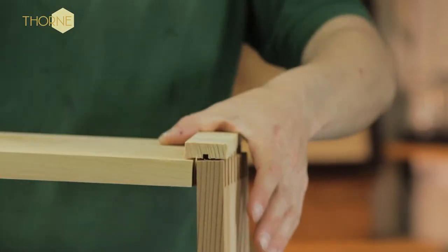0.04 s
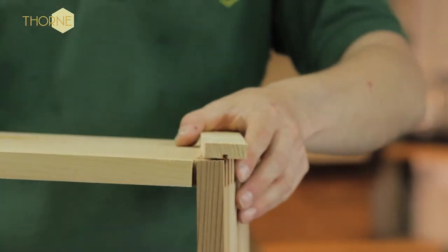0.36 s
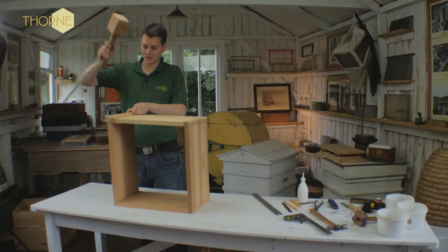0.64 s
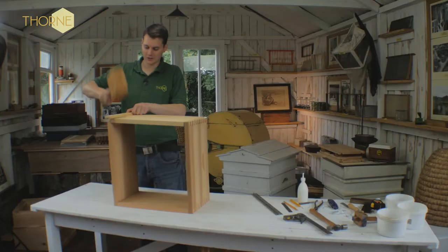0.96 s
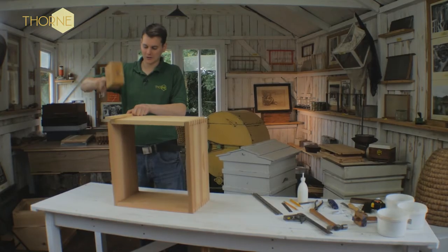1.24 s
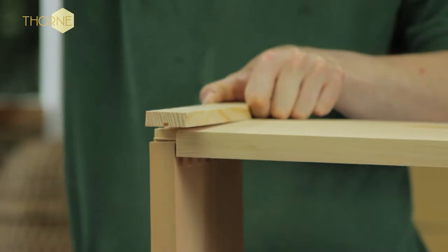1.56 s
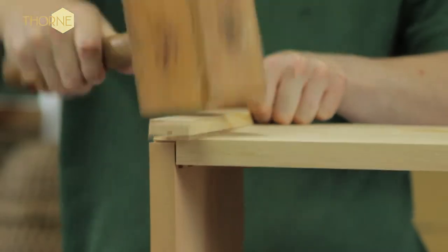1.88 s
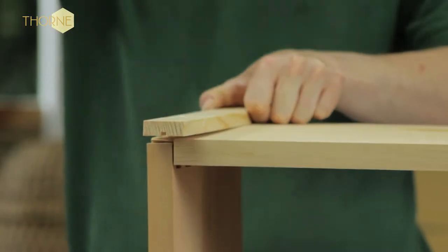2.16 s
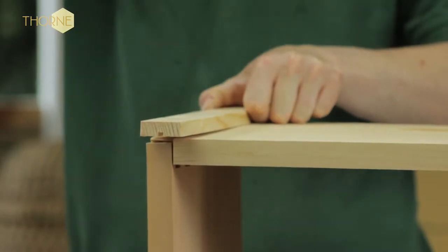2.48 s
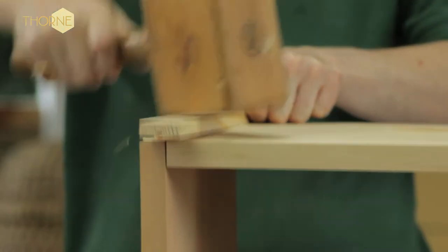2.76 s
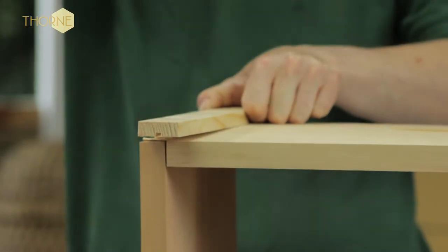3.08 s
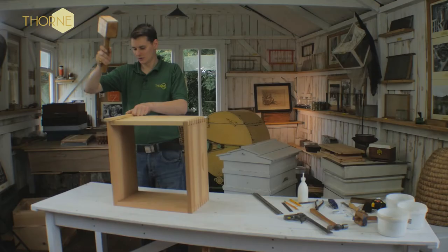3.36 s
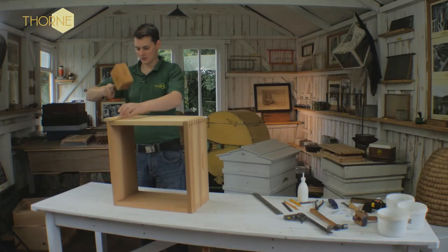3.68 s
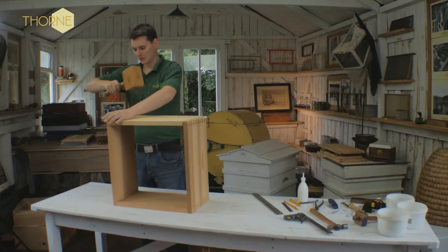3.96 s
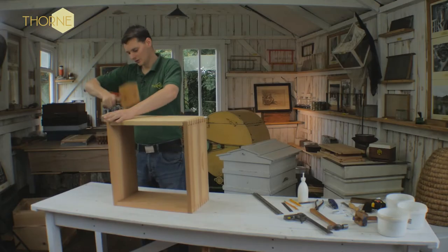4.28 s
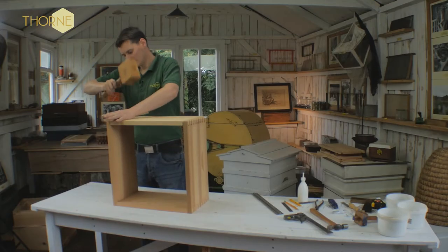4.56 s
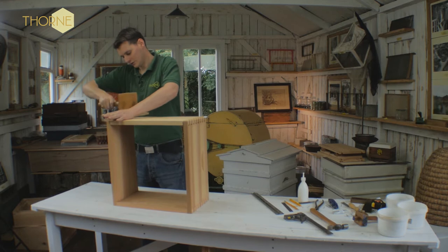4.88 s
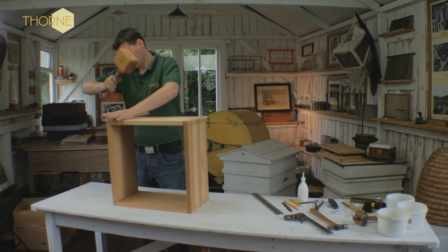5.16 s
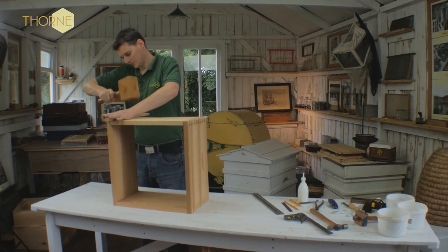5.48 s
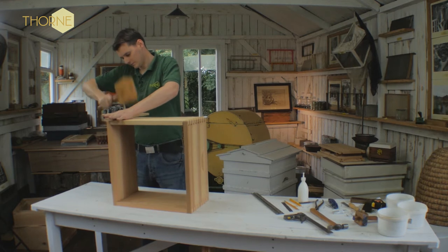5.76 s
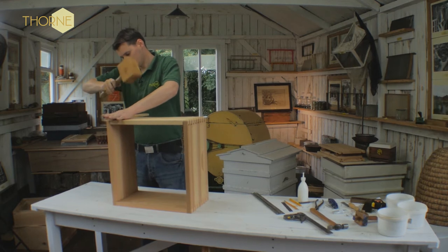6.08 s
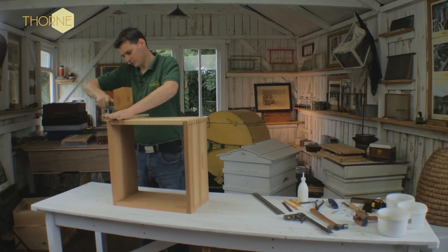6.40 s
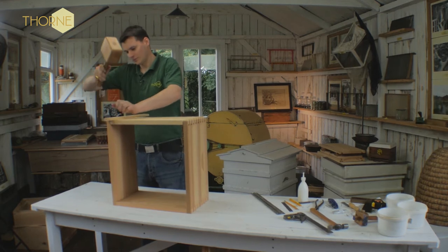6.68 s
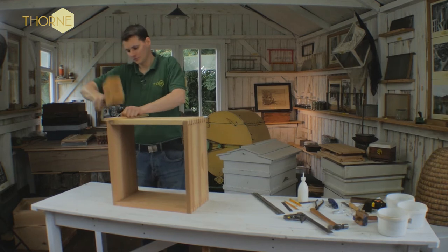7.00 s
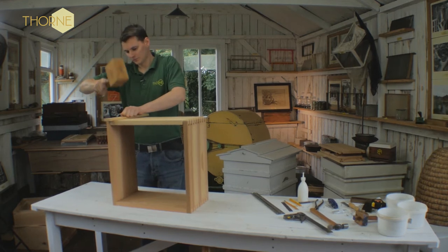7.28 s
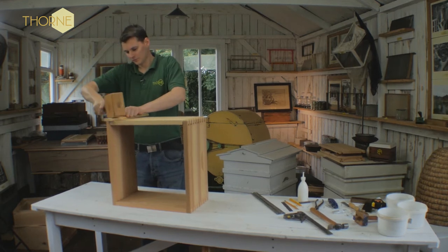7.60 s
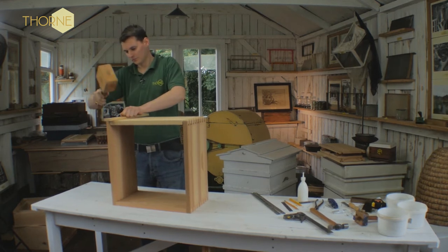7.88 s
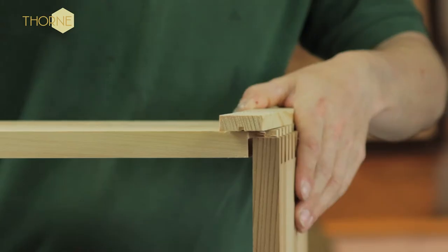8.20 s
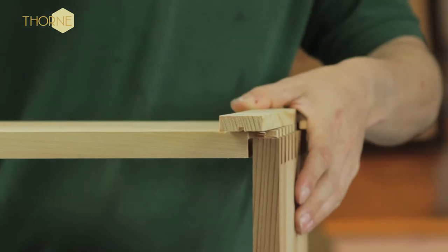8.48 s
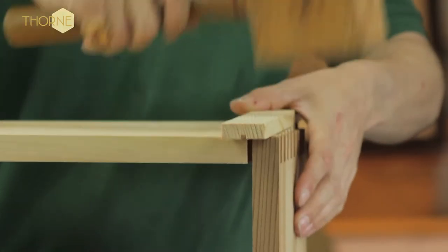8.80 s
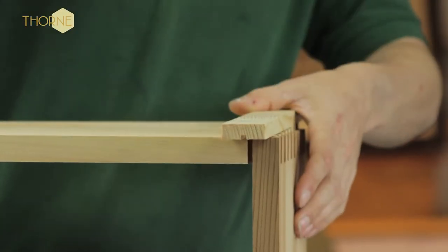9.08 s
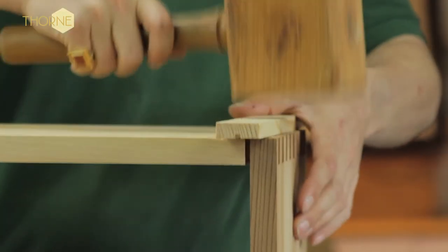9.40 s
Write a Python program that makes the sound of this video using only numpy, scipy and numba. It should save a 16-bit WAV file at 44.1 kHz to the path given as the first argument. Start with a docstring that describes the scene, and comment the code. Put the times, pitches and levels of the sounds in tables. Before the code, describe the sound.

A wooden mallet knocks a hollow wooden box together in a small timber workshop. Each blow is a sharp crack with a boxy ring and a short room echo, followed by a faint swell of bright hiss. The close microphone overloads slightly on the hits.

The sound opens on the fading echo of an earlier blow, with a very faint whirr and airy hiss. Three loud blows land at about 1.1, 1.9 and 2.7 seconds, with soft bumps and a tiny tick between them. A light wooden clack comes at 4 seconds. Five slightly quieter, boomier knocks follow half a second apart from 4.4 to 6.3, then two duller ones at 7.1 and 7.6. Two louder blows land at 8.7 and 9.3, with a soft bump between them and the faint whirr returning. Low hum and quiet room noise run throughout.

```python
"""A wooden mallet knocks the walls of a beehive box together on a bench in a timber workshop. Each blow cracks,
rings the box modes and fills the room; a bright hiss swells just after it. Between blows: a light clack, soft
bumps, a faint tick, short spans of soft airy hiss, a faint whirr. The close microphone overloads on the blows
and a limiter pulls the level down. A low hum and room noise lie underneath; the middle stretch is quieter."""
import sys
import numpy as np
from scipy import signal
from scipy.fft import rfft, irfft
from scipy.io import wavfile
from numba import njit

SR = 44100
rng = np.random.default_rng(int(sys.argv[2]) if len(sys.argv) > 2 else 0)


def transcribe(u):
    """Save the signal u as a 16-bit wav file named by the first command-line argument.

    u: samples, shape (n,) or (channels, n), limited to [-1, 1]; the rate is SR.
    q: integer samples, one column per channel.
    """
    v = np.clip(np.atleast_2d(u).T, -1, 1)
    q = np.round(v * 32767).astype(np.int16)
    wavfile.write(sys.argv[1], SR, q)


N = 420699
TIME_S = np.arange(N) / SR
AGE_S = TIME_S[:SR]
MIDDLE_S = (3.62, 8.3, 0.16)  # quieter stretch: start, end, fade

# mallet blows: t/s, force/dB, box boom/dB, wall knock/dB, brightness/dB, hiss/dB, hiss swell time/s
BLOWS = [(1.0506, 2, -1.5, -1, -0.2, -35, 0.16), (1.8898, 4.5, -1.5, -3.5, 0, -33.5, 0.19),
         (2.7449, 1.66, -1, 3, 0, -33.5, 0.17), (4.3634, -2.5, 2, -1, -1.9, -37.5, 0.15),
         (4.8639, -3, 2.5, 1.5, -1.7, -34.5, 0.16), (5.3525, -2.5, 6, 3, 1.3, -30.5, 0.18),
         (5.8504, -0.9, 4, 4, 1.5, -29, 0.21), (6.3211, 2, -0.5, -0.5, 0, -31.5, 0.13),
         (7.092, 0, 2, 2.5, -4.5, -34, 0.15), (7.639, 2, -1.5, 2, -4.5, -33.5, 0.16),
         (8.7029, -2, -3, -0.5, 1.5, -34, 0.13), (9.3473, 2, -4.5, -1, -2.5, -29, 0.13)]
# airy spectrum of soft hiss and tick: f/Hz, level/dB
AIR_COLOUR = [(1000, -14.5), (3000, -2), (6500, -1), (9500, -5.5), (12000, -19), (16000, -17.5)]


def mallet(crack_db=10, ring_db=-9, room_db=-9.5):
    """Each blow: crack, box ring and room tail, coloured by where the mallet lands."""
    # dense wood modes of mallet face and struck rail: f/Hz, level/dB, t60/s
    crack_bands = [(60, -8.5, 0.22), (300, -4, 0.11), (790, 0, 0.054), (1700, -2, 0.05), (3230, 1.5, 0.044),
                   (6010, -4.5, 0.033), (9950, -7.5, .025), (16100, -32.5, 0.024)]
    direct, room = np.zeros((2, N))
    for t_s, force_db, boom_db, knock_db, bright_db, _, _ in BLOWS:
        blow = gain_of(crack_db) * dying_noise(crack_bands) + gain_of(ring_db) * box_ring()
        colour = [(140, boom_db), (280, knock_db), (400, knock_db),
                  (650, 0), (1300, 0), (2600, bright_db)]
        add(direct, t_s, gain_of(force_db) * coloured(blow, colour))
        add(room, t_s, gain_of(force_db + room_db) * coloured(room_tail(), colour))
    return direct + near_echoes(room)


def box_ring(scatter_db=2.5, detune=0.006):
    """Damped box modes; each blow lands differently and shares its energy out anew."""
    # box on its bench: f/Hz, level/dB, t60/s
    modes = [(66, -13.5, 0.055), (131.2, 2, .24), (139, -12, .3), (187.3, -11, .26), (200.4, -14, 0.53),
             (247, -10, 0.14), (256, -8, 0.61), (273, -2.5, 0.21), (293.6, -1.5, 0.18), (316.4, -5.5, 0.33),
             (350, -9, .35), (444, -12.5, 0.15), (729, -9, 0.37), (783, -9.5, 0.37), (802, -12, 0.45),
             (880, -8, .2), (1162, -9, 0.091), (1593, -4.5, .16), (1640, -5, 0.099), (1782, -5, .2),
             (2625, -10.5, 0.14), (3184, -10, 0.19)]
    f_hz, level_db, t60_s = np.transpose(modes)[:, :, None]
    strength, shift, phase = rng.standard_normal((len(modes), 3)).T[:, :, None]
    swing = np.sin(2 * np.pi * (f_hz * (1 + detune * shift) * AGE_S + phase))
    envelope = gain_of(level_db + scatter_db * strength) * 1e-3 ** (AGE_S / t60_s)
    return (envelope * swing).sum(0)


def room_tail(build_s=0.0016):
    """Reflections from close timber walls thicken and die away."""
    # workshop reverberation: f/Hz, level/dB, t60/s
    reverb_bands = [(52, -7.5, .8), (128, 5, 0.92), (222, -2.5, .85), (321, 6.5, 0.91), (426, -1.5, 0.85),
                    (834, -1, 0.64), (1600, -1, 0.56), (3020, -6.5, 0.55), (5530, -10.5, .45),
                    (9100, -13.5, 0.38), (15000, -32.5, 0.33)]
    return dying_noise(reverb_bands) * (1 - np.exp(-AGE_S / build_s))


def near_echoes(x, count=14, span_s=0.018, energy_ratio=0.14):
    """Early echoes off bench and walls, random in delay and sign."""
    delay, polarity = rng.random((count, 2)).T
    out = x.copy()
    for delay_s, sign in zip(span_s * delay, np.sign(polarity - 0.5)):
        add(out, delay_s, sign * np.sqrt(energy_ratio / count) * x)
    return out / np.sqrt(1 + energy_ratio)


def late_hiss(swell_s, rise_s=0.11, fall_s=0.048, onset_s=0.02):
    """Bright hiss that swells for about swell_s, then fades."""
    # hiss spectrum: f/Hz, level/dB
    colour = [(200, -13.5), (1000, 5.5), (2500, 0.5), (4700, -3.5), (5800, 0), (9300, -2.5), (10000, -9),
              (10900, -6.5), (11800, -16), (15500, -18)]
    swell = 2 / (np.exp((swell_s - AGE_S) / rise_s) + np.exp((AGE_S - swell_s) / fall_s))
    return noise(colour, SR) * swell * (1 - np.exp(-AGE_S / onset_s))


def hisses(gain_db=4.5):
    """One hiss after each blow."""
    out = np.zeros(N)
    for t_s, *_, hiss_db, swell_s in BLOWS:
        add(out, t_s, gain_of(gain_db + hiss_db) * late_hiss(swell_s))
    return out


def clacks(direct_db=-8, room_db=-21, hiss_db=-50, lowpass_hz=7500):
    """Light, dull clack of wood on wood with two rebounds and a faint hiss."""
    # contacts: t/s, level/dB
    contacts = [(3.9776, 0), (3.998, -6.5), (4.0128, -9)]
    # dense wood modes: f/Hz, level/dB, t60/s
    wood_bands = [(300, -8.5, 0.078), (1010, -8, 0.12), (1810, 5.5, 0.067), (3220, 1.5, 0.021),
                  (5030, -16, 0.023), (10000, -50, 0.018), (16000, -60, .02)]
    tail_colour = [(200, -6.5), (900, -15), (1850, -7), (3200, -9), (5500, -18)]
    out = np.zeros(N)
    for t_s, level_db in contacts:
        tail = gain_of(room_db) * coloured(room_tail(), tail_colour)
        clack = gain_of(direct_db) * dying_noise(wood_bands)
        add(out, t_s, gain_of(level_db) * (clack + tail))
    out = signal.sosfilt(signal.butter(3, lowpass_hz, fs=SR, output="sos"), out)
    add(out, contacts[0][0], gain_of(hiss_db) * late_hiss(swell_s=0.21))
    return out


def earlier_blow(level_db=-12, ago_s=0.22):
    """Room tail of a blow struck just before the start."""
    out = np.zeros(N)
    add(out, 0, gain_of(level_db) * room_tail()[round(ago_s * SR):])
    return out


def settling(rise_s=0.012, tick_s=1.598, tick_db=-52.5, tick_t60_s=0.06):
    """The box bumps softly as it settles on the bench; a faint tick sounds once."""
    # bumps: t/s, level/dB
    bumps = [(1.36, -32.5), (2.265, -26), (2.39, -32), (8.201, -43.5), (9.015, -35)]
    # their dense low modes: f/Hz, level/dB, t60/s
    bump_bands = [(99.8, -8.5, .3), (330, 1, .35), (800, -9, .25), (1590, -25, 0.073), (4000, -49, .1),
                  (16000, -70, .1)]
    out = np.zeros(N)
    for t_s, level_db in bumps:
        add(out, t_s, gain_of(level_db) * dying_noise(bump_bands) * (1 - np.exp(-AGE_S / rise_s)))
    add(out, tick_s, gain_of(tick_db) * noise(AIR_COLOUR, SR) * 1e-3 ** (AGE_S / tick_t60_s))
    return out


def soft_hiss(fade_s=0.04, waver_db=0.5):
    """Soft airy hiss that comes and goes in short stretches."""
    # spans: start/s, end/s, level/dB
    spans = [(0, 0.352, -62), (0.581, 1.026, -57), (3.45, 4.007, -61.5), (8.136, 8.21, -54.5)]
    envelope = sum(gain_of(db) * stretch(start_s, end_s, fade_s) for start_s, end_s, db in spans)
    return noise(AIR_COLOUR, N) * envelope * gain_of(waver_db * waver(rate_hz=30))


def whirr(centre_hz=1290, fade_s=0.15, waver_db=1):
    """Faint, wavering narrow noise band at the start and again near the end."""
    # spans: start/s, end/s, level/dB
    spans = [(0, 1.04, -53), (8.297, 9.54, -58.5)]
    envelope = sum(gain_of(db) * stretch(start_s, end_s, fade_s) for start_s, end_s, db in spans)
    colour = [(200, -45), (centre_hz - 230, -17), (centre_hz, 0), (centre_hz + 260, -15), (6000, -50)]
    return noise(colour, N) * envelope * gain_of(waver_db * waver(rate_hz=8))


def background(hum_hz=48.6, wander_hz=1.2, hum_db=-41.5, rumble_db=-50, room_db=-51, hiss_db=-68):
    """Hum, rumble, room noise and input hiss; in the middle the room dulls and the hiss drops out."""
    # room noise ahead of the high-pass: f/Hz, level/dB
    room_colour = [(12, -50.5), (20, -13), (32, -5.5), (55, 10), (67, 7), (81, -25.5), (177, -20.5),
                   (216, -29), (434, -33), (558, -28.5), (718, -34), (1290, -35.5), (2200, -43.5),
                   (5380, -51), (16000, -60.5)]
    # treble loss in the middle stretch: f/Hz, gain/dB
    dulling = [(400, -1), (1500, 0), (6000, -3), (13000, -13)]
    pitch_hz = hum_hz + wander_hz * waver(rate_hz=3)
    hum = np.sqrt(2) * np.sin(2 * np.pi * np.cumsum(pitch_hz) / SR)
    rumble = noise([(15, 4.5), (40, -1.5), (55, -15), (80, -18), (300, -70.5), (3000, -120)], N)
    highpass = signal.butter(4, 100, "high", fs=SR, output="sos")
    steady = unit_rms(signal.sosfilt(highpass, noise(room_colour, N)))
    middle = stretch(*MIDDLE_S)
    room_noise = (1 - middle) * steady + middle * coloured(steady, dulling)
    input_hiss = (1 - middle) * rng.standard_normal(N)
    return (gain_of(hum_db) * hum + gain_of(rumble_db) * rumble
            + gain_of(room_db) * room_noise + gain_of(hiss_db) * input_hiss)


def gain_of(db):
    """dB to amplitude."""
    return 10 ** (np.asarray(db) / 20)


def unit_rms(x):
    """Scale to rms 1."""
    return x / np.sqrt(np.mean(x ** 2) + 1e-20)


def curve_at(points, f_hz):
    """Interpolate (f/Hz, value) points over log frequency."""
    knots_hz, values = np.transpose(points)
    return np.interp(np.log(f_hz + 1), np.log(knots_hz + 1), values)


def add(mix, t_s, sound):
    """Mix a sound in at t_s."""
    part = mix[round(t_s * SR):][:len(sound)]
    part += sound[:len(part)]


def stretch(start_s, end_s, fade_s):
    """Trapezoid envelope, 0 to 1."""
    return np.clip(np.minimum(TIME_S - start_s, end_s - TIME_S) / fade_s, 0, 1)


def noise(colour, size):
    """Noise of rms 1 shaped by (f/Hz, level/dB) points."""
    f_hz = np.fft.rfftfreq(size, 1 / SR)
    spectrum = rfft(rng.standard_normal(size)) * gain_of(curve_at(colour, f_hz))
    return unit_rms(irfft(spectrum, size))


def waver(rate_hz):
    """Slow random wander of rms 1."""
    return noise([(0, 0), (rate_hz, 0), (2 * rate_hz, -20), (20 * rate_hz, -140)], N)


def dying_noise(table):
    """Dense mode cluster: 1 s of noise, each band with its own t60."""
    centres_hz, level_db, t60_s = np.transpose(table)
    f_hz = np.fft.rfftfreq(SR, 1 / SR)
    spectrum = rfft(noise(np.c_[centres_hz, level_db], SR))
    masks = [curve_at(np.c_[centres_hz, share], f_hz) for share in np.eye(len(table))]
    return sum(irfft(spectrum * mask, SR) * 1e-3 ** (AGE_S / t60) for mask, t60 in zip(masks, t60_s))


def coloured(x, colour):
    """Causal filter from (f/Hz, gain/dB) points."""
    f_hz = abs(np.fft.fftfreq(4096, 1 / SR))
    log_gain = np.log(gain_of(curve_at(colour, f_hz)))
    response = np.exp(np.conj(signal.hilbert(log_gain)))  # minimum phase
    return signal.oaconvolve(x, np.fft.ifft(response).real)[:len(x)]


@njit
def follow(level, attack, release):
    """Level follower; attack and release are per-sample coefficients."""
    out = np.zeros(len(level))
    held = 0.
    for i in range(len(level)):
        held += (level[i] - held) * (attack if level[i] > held else release)
        out[i] = held
    return out


def scene():
    """Mono sum at the microphone."""
    work = mallet() + near_echoes(hisses() + soft_hiss()) + clacks() + settling() + earlier_blow()
    return (work + whirr() + background())[None]


def record(dry, ceiling=0.95, threshold=0.67, attack_s=0.004, release_s=0.021,
           volume_db=-2, middle_dip_db=-3.5, lowpass_hz=16000):
    """Input overload, lagging limiter, volume with a dip in the middle, band limit."""
    x = dry[0]
    clipped = x / (1 + (x / ceiling) ** 4) ** (1 / 4)
    level = follow(abs(clipped), 1 / (attack_s * SR), 1 / (release_s * SR))
    limited = clipped / np.maximum(level / threshold, 1)
    volume = gain_of(volume_db + middle_dip_db * stretch(*MIDDLE_S))
    out = np.clip(limited * volume, -1, 1)
    lowpass = signal.firwin(255, lowpass_hz, window=("kaiser", 7), fs=SR)
    return signal.oaconvolve(out, lowpass, "same")[None]


dry = scene()
out = record(dry)
transcribe(out)
```